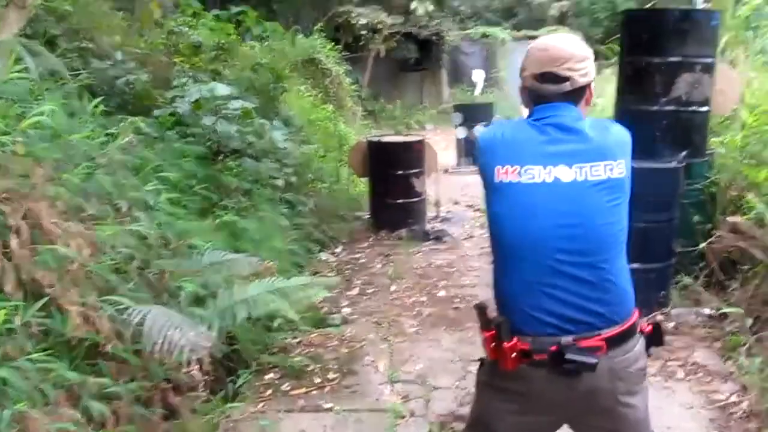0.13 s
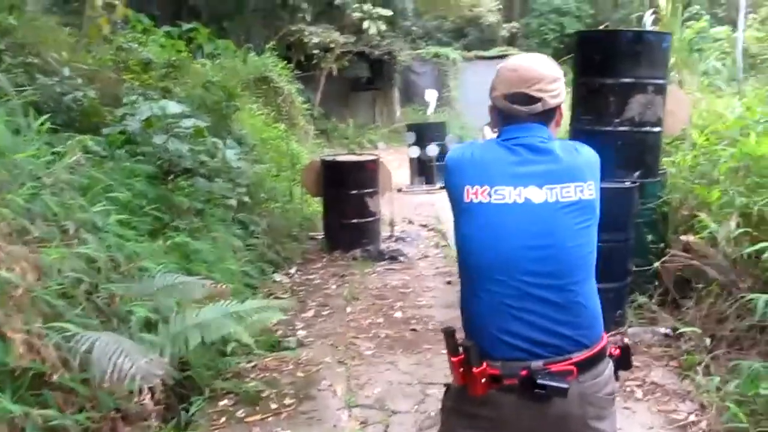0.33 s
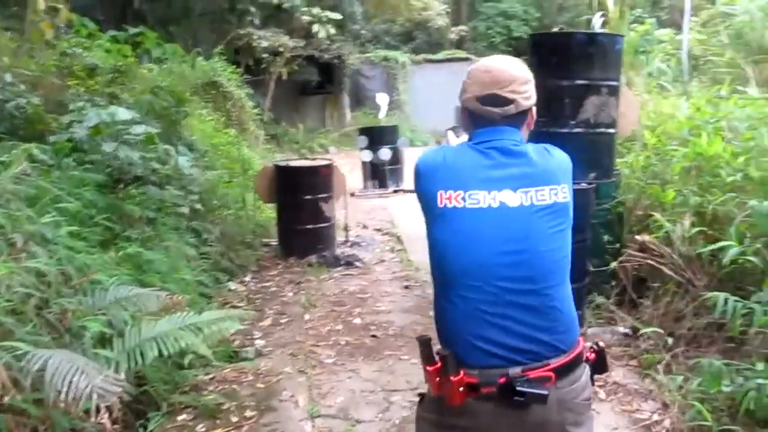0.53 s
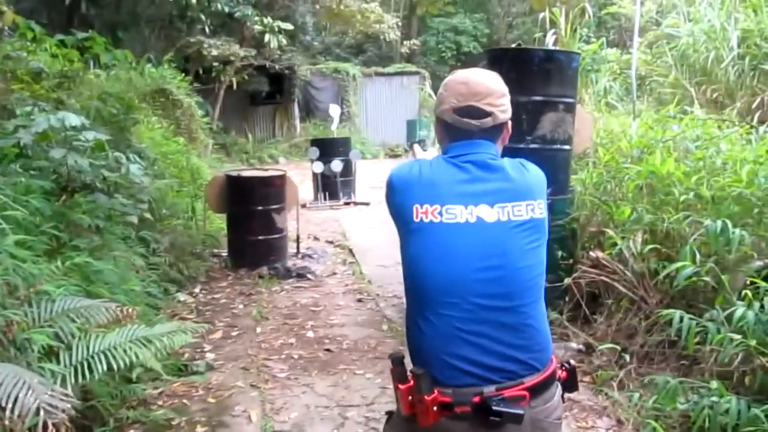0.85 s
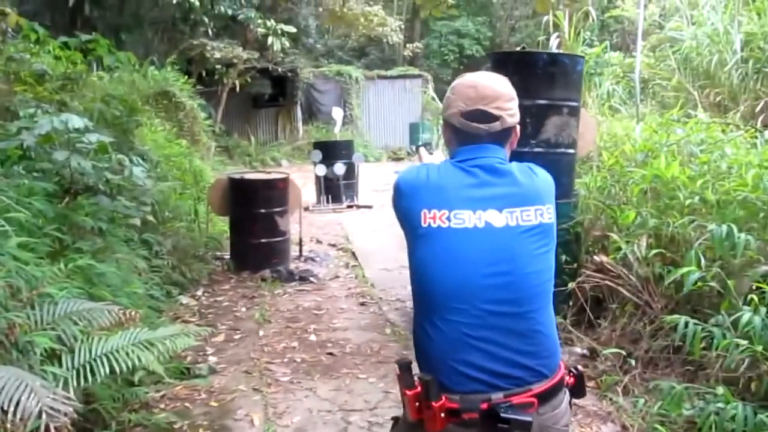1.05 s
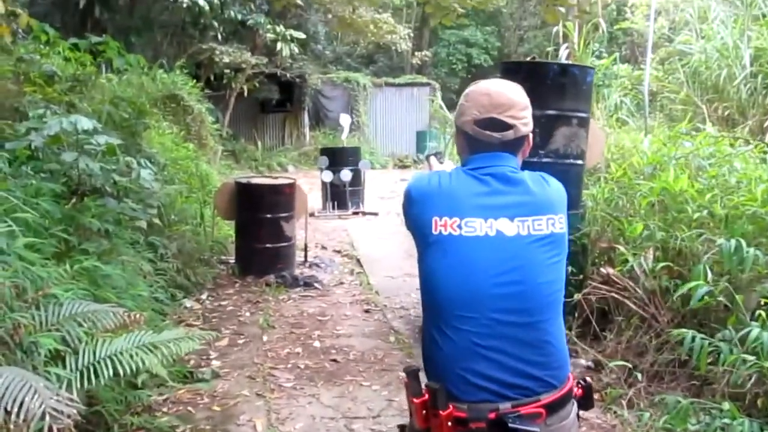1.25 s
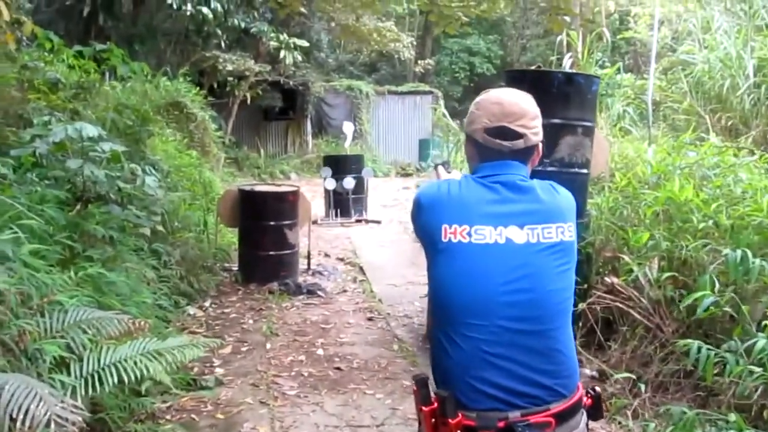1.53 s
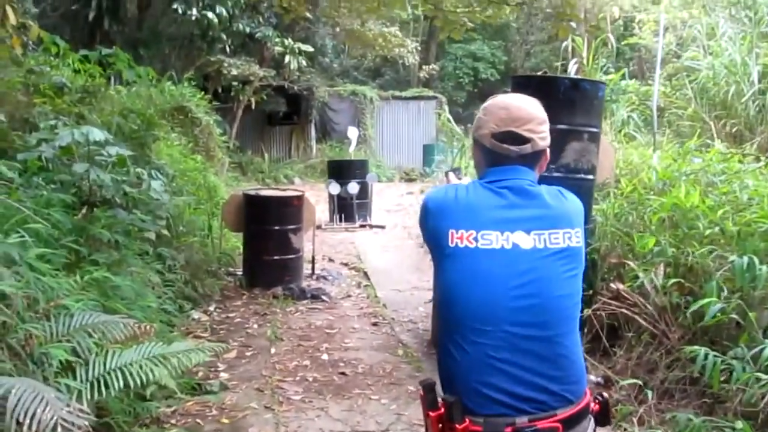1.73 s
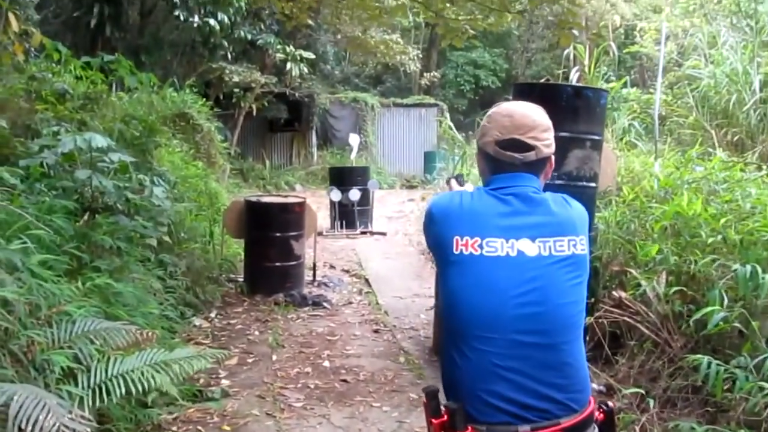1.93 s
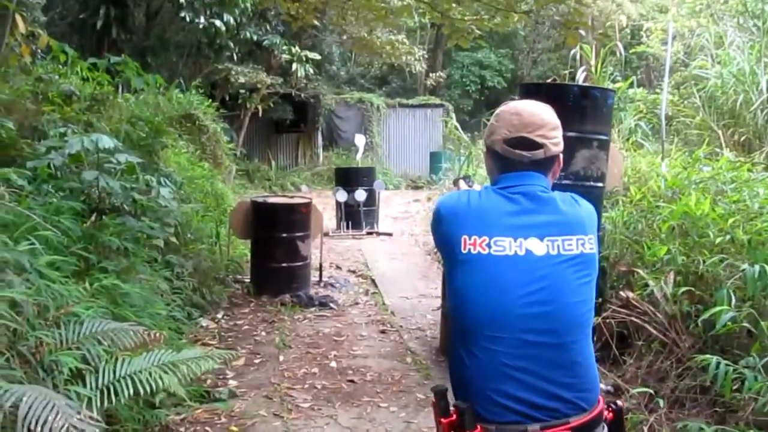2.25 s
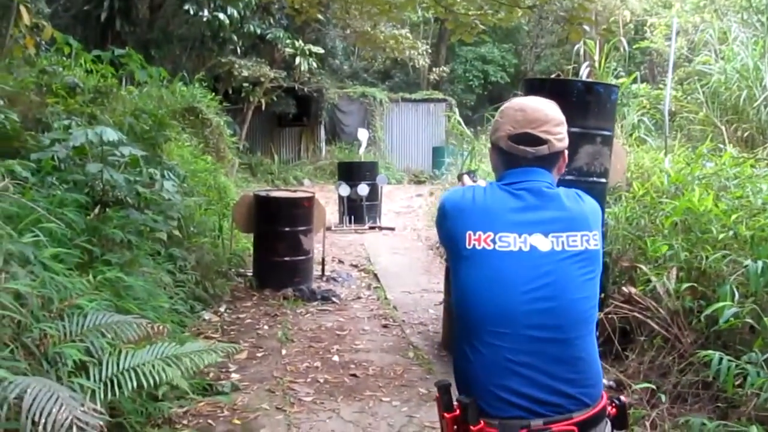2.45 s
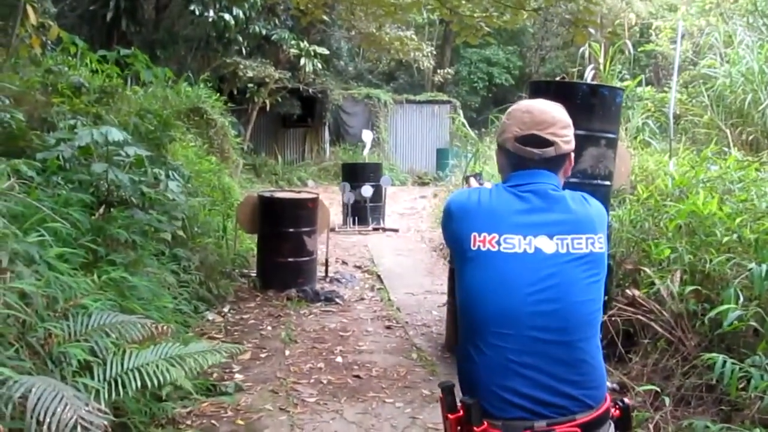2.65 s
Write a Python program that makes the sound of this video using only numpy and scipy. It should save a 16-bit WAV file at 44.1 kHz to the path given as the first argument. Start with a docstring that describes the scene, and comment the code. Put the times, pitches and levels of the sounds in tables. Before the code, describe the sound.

An airsoft gas pistol fires six close, bright cracks with slide clacks and short outdoor echo at about 0.2, 0.55, 1.0, 1.4, 1.95 and 2.4 seconds. Pellets strike 0.1 second later: thin sheet metal twice, a small steel plate at 1.1, sheet at 1.5 and 2.05, a larger plate at 2.5. Falling plates rattle near 1.65 and 2.7. Faint air, rumble and rustling continue underneath.

```python
"""Quiet outdoor air, a far rumble and a wavering rustle, all coloured noise, run throughout.
From 0.2 s a gas pistol fires six times: hammer hiss, crack, low pop, slide clacks and a noise echo.
About 0.11 s after each shot its pellet hits: sheet, sheet, small plate, sheet, sheet, large plate.
Sheet and plates are decaying sines with noise; short rattles of falling plates follow
from 1.6 to 1.75 s, in the modes of both plates, and from 2.69 s in those of the large one."""
import sys
import numpy as np
from scipy import signal
from scipy.fft import rfft, irfft
from scipy.io import wavfile
from scipy.ndimage import uniform_filter1d

SR = 44100
rng = np.random.default_rng(int(sys.argv[2]) if len(sys.argv) > 2 else 0)


def file_out(sig):
    """Save sig as 16-bit WAV at sys.argv[1]."""
    # one column per channel
    cols = np.atleast_2d(sig).T
    # limit, then scale
    lim = np.clip(cols, -1, 1)
    pcm = np.round(lim * 32767).astype(np.int16)
    wavfile.write(sys.argv[1], SR, pcm)


N = 123479

# left-right likeness of noise and modes: pitch_hz, likeness (0-1)
LIKENESS = [(60, 0.86), (250, .98), (1000, 0.95), (3000, 0.5), (8000, 0.13)]
# colour of a pellet smack: pitch_hz, level_db
SMACK_COLOUR = [(180, -69), (300, -64), (1450, -19), (1670, -38.5), (1980, -25), (2310, -11), (3630, -16.5),
                (4810, -2), (5620, -17), (6270, -7), (12400, -15), (16200, -43), (22000, -120)]


def amp(db):
    """Decibels to amplitude ratio."""
    return 10 ** (np.asarray(db, float) / 20)


def read(points, hz):
    """Table value at each pitch, interpolated over log frequency."""
    point_hz, value = np.transpose(points)
    return np.interp(np.log(hz + 1), np.log(point_hz + 1), value)


def add(mix, start_s, sound, pan_db=0):
    """Mix a sound in at its start; pan_db is left over right."""
    part = mix[:, round(start_s * SR):][:, :sound.shape[-1]]
    panned = sound * amp([[pan_db / 2], [-pan_db / 2]])
    part += panned[:, :part.shape[1]]


def hiss(colour, secs, wide=1):
    """Stereo noise of rms 1 with the given colour; a smaller wide makes the channels more alike."""
    length = round(secs * SR)
    n = length + 2048
    hz = np.fft.rfftfreq(n, 1 / SR)
    left, other = rfft(rng.standard_normal((2, n)))
    same = np.clip(read(LIKENESS, hz), 0, 1) ** wide
    right = same * left + np.sqrt(1 - same ** 2) * other
    x = irfft(np.array([left, right]) * amp(read(colour, hz)), n)[:, :length]
    return x / np.sqrt(np.mean(x ** 2))


def background():
    """Outdoor air, a distant rumble and a rustle of clothing or leaves: noises of fixed colour."""
    # colours: pitch_hz, level_db
    air_colour = [(20, -8), (60, 1), (150, 1), (280, -7), (550, -3), (750, -9), (1140, -6), (1700, -11),
                  (3800, -5), (6000, -10), (8400, -8), (12400, -24), (16000, -60)]
    rumble_colour = [(20, -35), (50, -6), (72, 11), (90, -3), (150, 4), (200, -11), (400, -66)]
    rustle_colour = [(120, -42), (200, -12), (246, 4), (278, -36), (399, 1), (545, -39), (869, -3),
                     (915, -31), (1890, -15), (3710, -1), (4900, -8), (8370, 0), (12400, -23), (16200, -70),
                     (22000, -120)]
    # rustle swell: time_s, level_db
    rustle_level = [(0, -49), (.1, -46.5), (.2, -44), (.5, -40), (.95, -48.5), (1.35, -54), (1.7, -63),
                    (2.8, -44)]
    air_db, rumble_db = -57.5, -71.5
    time_s, level_db = np.transpose(rustle_level)
    air = amp(air_db) * hiss(air_colour, N / SR)
    rumble = amp(rumble_db) * hiss(rumble_colour, N / SR)
    rustle = hiss(rustle_colour, N / SR) * amp(np.interp(np.arange(N) / SR, time_s, level_db))
    return air + rumble + rustle


def burst(colour, t60_s, wide=1, rise_s=0.0005):
    """Coloured noise that starts sharply and dies away."""
    t = np.arange(0, 1.2 * t60_s + .002, 1 / SR)
    return hiss(colour, len(t) / SR, wide) * np.minimum(t / rise_s, 1) * amp(-60 * t / t60_s)


def click(colour):
    """Minimum-phase impulse of the given colour, peak 1, slightly different left and right."""
    hz = np.fft.rfftfreq(512, 1 / SR)
    # a scatter common to both channels plus a smaller one that differs
    scatter_db = [[2, 1.8, 0], [2, 0.28, 0.62]] @ rng.standard_normal((3, len(hz)))
    log_gain = np.log(amp(np.maximum(read(colour, hz), -60) + scatter_db))
    # folded cepstrum gives the minimum phase
    fold = irfft(log_gain)[:, :256] * np.r_[1, 2 * np.ones(255)]
    x = irfft(np.exp(rfft(fold, 512)))[:, :256]
    return rng.choice([-1, 1]) * x / abs(x).max()


def ring(modes, secs, focus_hz=None, damp_db_per_s=0, spread_db=0, split=0):
    """Decaying sines in close pairs; phases differ between the channels as pitch rises."""
    partner_db = -5  # weaker one of the pair
    focus_db_per_octave = -18  # away from the favoured pitch
    hz, db, t60_s = np.transpose(list(modes) * 2)
    r = rng.standard_normal((len(hz), 4))
    t = np.arange(0, secs, 1 / SR)
    size_db = db + np.repeat([0, partner_db], len(hz) // 2) + spread_db * r[:, 0]
    if focus_hz:
        size_db = size_db + focus_db_per_octave * abs(np.log2(hz / focus_hz))
    skew = np.arccos(np.clip(read(LIKENESS, hz), 0, 1)) * r[:, 2]
    phase = np.pi * r[:, 3] + np.array([skew * 0, skew])
    start = amp(size_db) * np.exp(1j * phase)
    turn = np.exp(np.outer(2j * np.pi * hz * (1 + split * r[:, 1]) - np.log(1000) / t60_s, t))
    return (start @ turn).imag * amp(-damp_db_per_s * t) * np.minimum(t / 0.00043, 1)


def wash(colour, t60s, secs):
    """Noise whose bands die at their own speeds."""
    hz, t, z = signal.stft(hiss(colour, secs), SR, nperseg=256)
    decay = amp(-60 * t / read(t60s, hz)[:, None])
    return signal.istft(z * decay, SR, nperseg=256)[1][:, :round(secs * SR)]


def echo():
    """Bushes and sheds return a shot as a near wash and a fainter, longer one."""
    # colours of the near and far wash: pitch_hz, level_db
    near_colour = [(59, -55), (100, -12), (229, -30), (464, 11.5), (545, 6.5), (640, -5), (959, -1.5),
                   (1270, -7), (5230, 0.5), (10800, -6.5), (12400, -14), (16200, -49), (22000, -120)]
    far_colour = [(300, -17), (600, -6), (1500, -8.5), (4000, -3.5), (9000, -4.5), (12400, -15),
                  (16000, -52)]
    # near wash decay: pitch_hz, t60_s
    near_t60 = [(150, 0.19), (500, 0.085), (2000, 0.32), (5000, 0.28), (12000, 0.24)]
    near_db, far_db, far_t60_s = -20.5, -36, 1
    near = amp(near_db) * wash(near_colour, near_t60, .6)
    t = np.arange(near.shape[1]) / SR
    far = hiss(far_colour, .6) * amp(far_db - 60 * t / far_t60_s)
    return (near + far) * np.minimum(t / 0.004, 1)


def pistol():
    """Hammer hiss swells into the crack; pop and slide clacks follow, each knock ringing the slide."""
    # shots: crack_s, level_db, left_over_right_db, slide_ring_db
    shots = [(0.2058, 2.5, -1.5, -5.5), (0.5533, 1.5, -1, -1), (0.9952, 0, -1, 0.5),
             (1.3807, 0.5, -1, -2.5), (1.9426, -0.5, -1, -0.5), (2.4084, -1, 0.5, -0.5)]
    # bright knocks of one firing cycle: delay_s, click_db, fizz_db, fizz_t60_s (before random spread)
    knocks = [(0, 0, -15, .003), (.0011, -3, -15, .004), (.004, -8, -17, .012), (.0112, -9, -19, .008),
              (.025, -17, -21, .012), (.042, -21, -25, .012), (.058, -23, -28, .012)]
    # colours: pitch_hz, level_db
    crack_colour = [(88, -36), (150, -28.5), (778, -13), (1720, -6), (2270, -5.5), (4500, -5), (5320, -2),
                    (7700, -5), (9430, -5.5), (12400, -16.5), (16200, -48), (22000, -120)]
    pop_colour = [(71, -38), (120, -4.5), (363, 0), (1050, 0.5), (1530, 5.5), (2050, 5.5), (2330, 0),
                  (2810, -7), (3660, -4), (4210, -11), (5000, -13), (6500, -37), (11000, -120)]
    # slide modes: pitch_hz, level_db, t60_s
    slide_modes = [(5250, 3, 0.018), (6415, 0, 0.029), (3874, -17.5, 0.013), (1055, -9.5, 0.067)]
    knock_spread_db, knock_spread_s = 4.5, .0008
    hammer_s, hammer_db = .0036, -16
    pop_delay_s, pop_db, pop_t60_s = 0.011, -11.5, .012
    out = np.zeros((2, N))
    for crack_s, db, pan_db, slide_db in shots:
        shot = np.zeros((2, SR))
        swell = hiss(crack_colour, 0.0082)[:, :round(hammer_s * SR)]
        add(shot, 0, amp(hammer_db) * swell * np.linspace(0, 1, swell.shape[1]) ** 2)
        for delay_s, click_db, fizz_db, t60_s in knocks:
            # later knocks vary more, up to the full spread at 22 ms
            r = rng.standard_normal(2) * min(delay_s / 0.022, 1)
            knock = amp(knock_spread_db * r[0])
            at_s = hammer_s + delay_s + knock_spread_s * r[1]
            slide = ring(slide_modes, .1, spread_db=3.5, split=0.0085)
            add(shot, at_s, knock * amp(fizz_db) * burst(crack_colour, t60_s))
            add(shot, at_s, knock * amp(click_db) * click(crack_colour))
            add(shot, at_s, knock * amp(click_db + slide_db - 18) * slide)
        pop = burst(pop_colour, pop_t60_s, 0.15, 0.00077)
        add(shot, hammer_s + pop_delay_s, amp(pop_db) * pop)
        add(shot, hammer_s, echo())
        add(out, crack_s - hammer_s, amp(db) * shot, pan_db)
    return out


def flutter(x):
    """Leaves and moving air make a far ring waver, band by band."""
    flutter_hz, depth = 40, .55
    hz, t, z = signal.stft(x, SR, nperseg=256)
    smooth_frames = max(round(SR / 128 / flutter_hz), 1)
    wobble = uniform_filter1d(rng.standard_normal((2,) + z.shape), smooth_frames, -1)
    wobble /= wobble.std()
    wavering = z * (1 + depth * (wobble[0] + 1j * wobble[1]))
    return signal.istft(wavering, SR, nperseg=256)[1][:, :x.shape[1]]


def sheet():
    """Thin metal rings in a dense crowd of modes, a few of them standing out."""
    # hits: start_s, level_db, low_db, treble_db, damping_db_per_s, rise_s
    hits = [(.315, -21, 3, -0.5, 23.5, 0.0013), (.663, -21.5, -3, 1, 18.5, 0.002),
            (1.491, -25.5, -6, 5, 48, 0.0017), (2.051, -18.5, -7, -3, 13, 0.0014)]
    # colour of the crowd (before normalizing): pitch_hz, level_db
    crowd_colour = [(180, -62), (300, -32), (443, -78), (615, -33.5), (1040, -11), (1340, -17),
                    (2880, -0.5), (3810, -11), (7210, -5.5), (7800, -14), (8700, -5), (12400, -12.5),
                    (16200, -49), (22000, -120)]
    # decay before extra damping: pitch_hz, t60_s
    crowd_t60 = [(500, 4.5), (1000, 1.32), (2500, 0.64), (5000, .55), (12000, 0.39)]
    # standout modes: pitch_hz, level_db, t60_s (before extra damping)
    line_modes = [(603, -6, 2.5), (642, -14, 2.5), (829, -14, 2.5), (912, -14, 2.1), (1012, -5, 3.0),
                  (1065, -11, 2.1), (1891, -9, .8), (2079, -7, .6), (2358, -5, .6), (2797, -5, .5),
                  (2961, -3, .6), (3123, -6, .5)]
    lines_db, wash_db, pan_db = -15, -4, -0.5
    out = np.zeros((2, N))
    hz = np.sort(rng.uniform(450, 12800, 400))
    for start_s, db, low_db, treble_db, damp_db_per_s, rise_s in hits:
        shade = [(1300, low_db), (1800, 0), (3500, 0), (5500, treble_db)]
        level_db = read(crowd_colour, hz) + read(shade, hz)
        level_db -= 10 * np.log10(np.sum(amp(2 * level_db)))  # total power 1
        crowd = ring(zip(hz, level_db, read(crowd_t60, hz)), .5, spread_db=1.5, split=0.00302)
        shaded = [(f, d + read(shade, f), t60_s) for f, d, t60_s in line_modes]
        lines = ring(shaded, .5, spread_db=1, split=.002)
        rough = wash(list(zip(hz, level_db)), crowd_t60, .5)
        t = np.arange(crowd.shape[1]) / SR
        fade = np.minimum((.5 - t) / 0.3, 1)
        shape = (1 - np.exp(-t / rise_s)) * amp(db - damp_db_per_s * t) * fade
        ringing = flutter(crowd + amp(lines_db) * lines)
        add(out, start_s, shape * (ringing + amp(wash_db) * rough), pan_db)
    return out


def plate(modes, hits, fall):
    """A hit is a noise smack and a clear ring; a fall is damped rings repeated at random instants."""
    # colour of the rattle tick: pitch_hz, level_db
    tick_colour = [(290, -63), (500, -62), (1200, 12), (3350, 19.5), (5700, -7), (7530, 6), (12000, -27),
                   (15600, -61), (22000, -120)]
    smack_t60_s, smack_echo_db, smack_echo_t60_s = 0.066, -19.5, 0.41
    pair_split = .003  # relative detuning; each mode is a close pair
    rattle_per_s = 600
    out = np.zeros((2, N))
    for start_s, ring_db, smack_db, pan_db in hits:
        smack = burst(SMACK_COLOUR, smack_t60_s, 0.23, 0.003)
        smack_echo = burst(SMACK_COLOUR, smack_echo_t60_s, 0.83, 0.012)
        add(out, start_s, amp(ring_db) * flutter(ring(modes, .6, split=pair_split)), pan_db)
        add(out, start_s, amp(smack_db) * smack, pan_db)
        add(out, start_s, amp(smack_db + smack_echo_db) * smack_echo, pan_db)
    for start_s, secs, ring_db, tick_db, fizz_db, focus_hz, damp_db_per_s in fall:
        draw = rng.random((round(secs * SR), 2))
        taps = (draw[:, 0] < rattle_per_s / SR) * (2 * draw[:, 1] - 1)
        taps[0] = 1
        taps /= np.linalg.norm(taps)
        knock = amp(ring_db) * ring(modes, 0.21, focus_hz, damp_db_per_s, 1.5, pair_split)
        add(knock, 0, amp(tick_db) * burst(tick_colour, .025, .5, .0008))
        add(knock, 0, amp(fizz_db) * burst(SMACK_COLOUR, 0.027, 0.33, 0.0017))
        # falls share the pan of the last hit
        add(out, start_s, signal.fftconvolve(flutter(knock), taps[None], axes=1), pan_db)
    return out


def small_plate():
    """Small steel plate: modes from about 2.5 kHz up, struck once, then rattling as it falls."""
    # modes: pitch_hz, level_db, t60_s
    modes = [(2480, -14, .3), (2595, -8, .3), (4339, -14, .8), (4554, -20, .6), (4830, 5, .05),
             (4813, -9, .23), (6067, -18, .7), (6455, -1, .16), (7241, -14, .24), (7364, -7, .19),
             (9189, -20, .3), (10270, -4, .16), (11570, -16, .3)]
    # hit: start_s, ring_db, smack_db, left_over_right_db
    hits = [(1.105, -24, -12, 0)]
    # rattles: start_s, length_s, ring_db, tick_db, fizz_db, favoured_hz, damping_db_per_s
    fall = [(1.606, .03, -27, -55, -50, 2550, 150), (1.639, .07, -23, -50, -47, 2550, 200),
            (1.654, .04, -40, -55, -45, 7200, 700), (1.712, .04, -31, -55, -50, 2550, 200)]
    return plate(modes, hits, fall)


def large_plate():
    """Large steel plate: modes from about 1.1 kHz up, rattling before and after its one hit."""
    # modes: pitch_hz, level_db, t60_s
    modes = [(1141, -16, 0.82), (1696, -12, 0.43), (2288, -19, 0.7), (2584, -15, 0.22), (2821, -18, 0.43),
             (3693, -12, 0.31), (3957, 0, 0.19), (4118, -18, 0.35), (4360, -16, 0.46), (4872, -10, 0.27),
             (6374, 0, 0.17), (7634, -13, 0.2), (8882, -15, 0.31), (11570, -23, 0.35)]
    # hit: start_s, ring_db, smack_db, left_over_right_db
    hits = [(2.516, -26, -12.5, -1.3)]
    # rattles: start_s, length_s, ring_db, tick_db, fizz_db, favoured_hz, damping_db_per_s
    fall = [(1.658, 0.02, -25.5, -43.5, -32, 1130, 350), (1.716, .03, -29.5, -39.5, -64, 8900, 696),
            (2.687, .001, -26, -25, -39, 1840, 150), (2.722, .035, -32.5, -35.5, -28.5, 6700, 600),
            (2.756, .003, -26, -33, -37, 2260, 250), (2.769, .04, -27, -36, -28, 1700, 150)]
    return plate(modes, hits, fall)


def scene():
    """Background plus pistol, sheet and plates; the near sources carry no deep bass."""
    low_cut_hz = 150
    near = pistol() + sheet() + small_plate() + large_plate()
    low_cut = signal.butter(4, low_cut_hz, "high", fs=SR, output="sos")
    return background() + signal.sosfilt(low_cut, near)


def record(dry):
    """Hard clip at full scale, then a linear-phase low-pass."""
    edge_hz = 12600
    low_pass = signal.firwin(401, edge_hz, window=("kaiser", 9), fs=SR)
    return signal.oaconvolve(np.clip(dry, -1, 1), low_pass[None], "same")


dry = scene()
out = record(dry)
file_out(out)
```